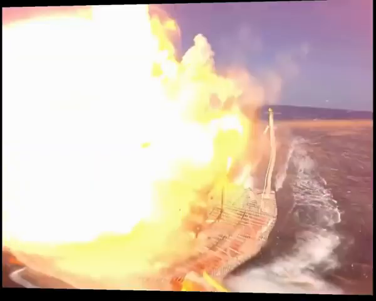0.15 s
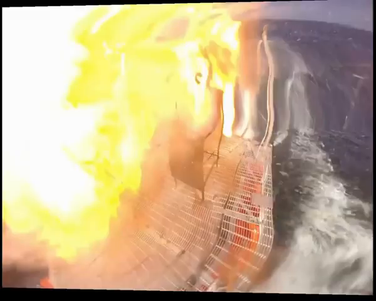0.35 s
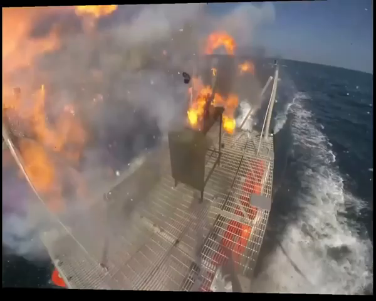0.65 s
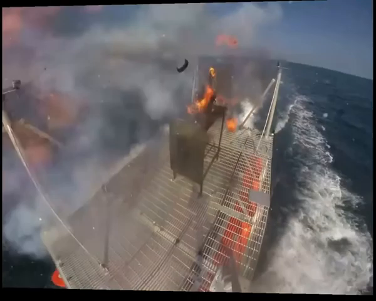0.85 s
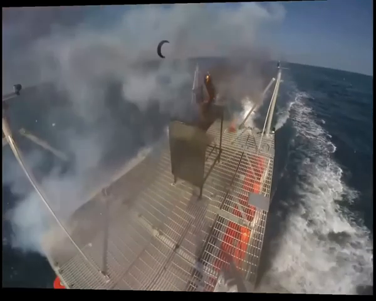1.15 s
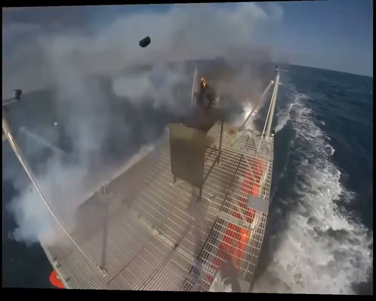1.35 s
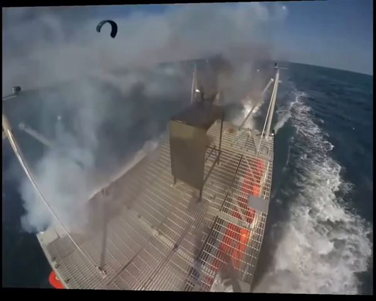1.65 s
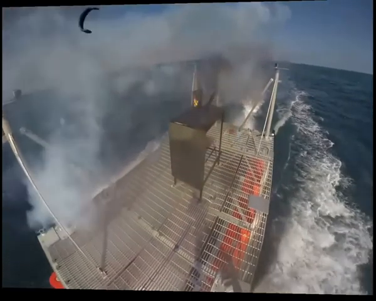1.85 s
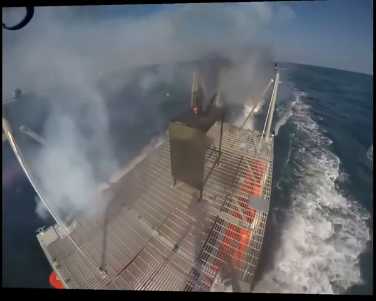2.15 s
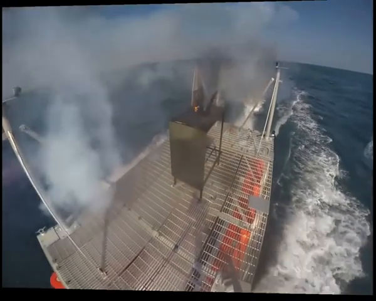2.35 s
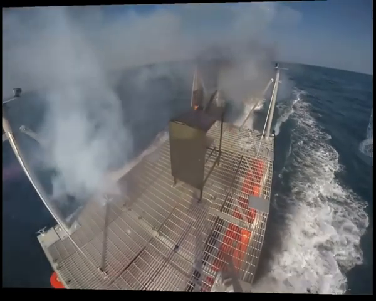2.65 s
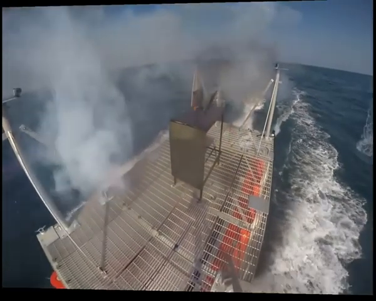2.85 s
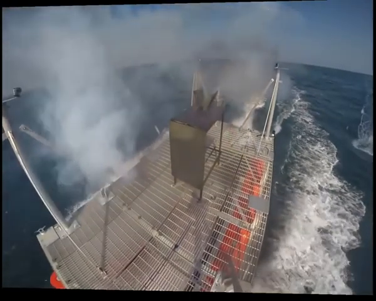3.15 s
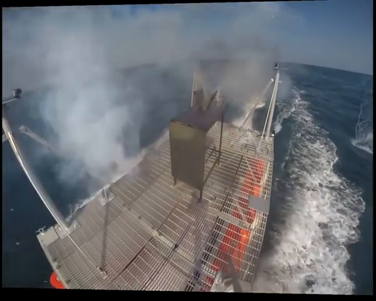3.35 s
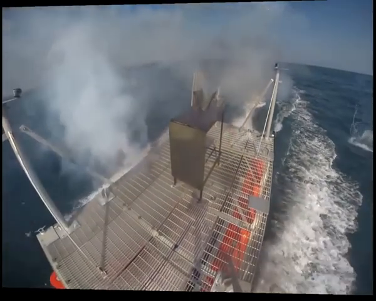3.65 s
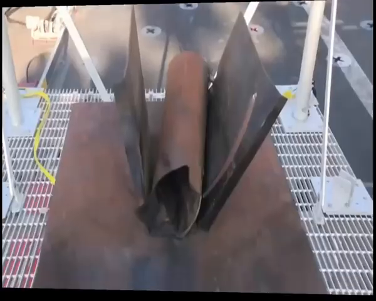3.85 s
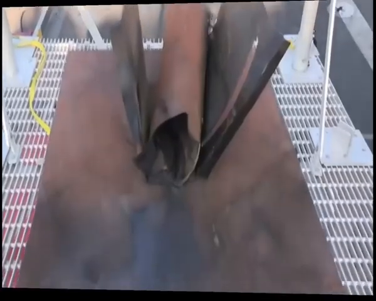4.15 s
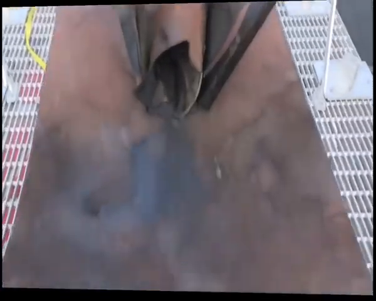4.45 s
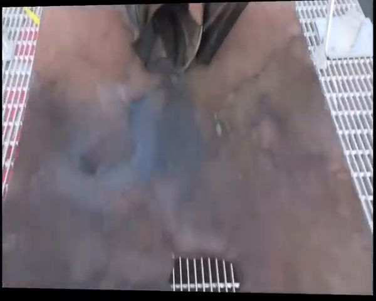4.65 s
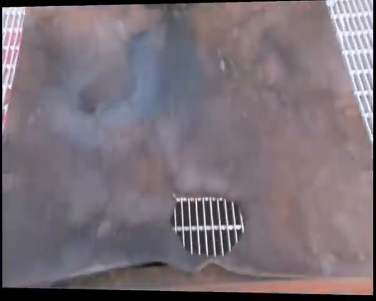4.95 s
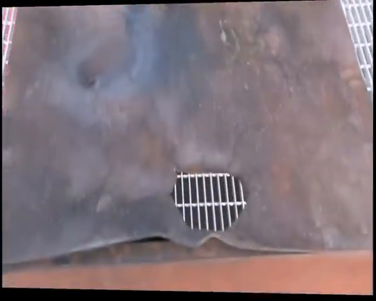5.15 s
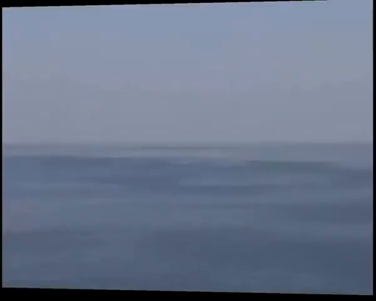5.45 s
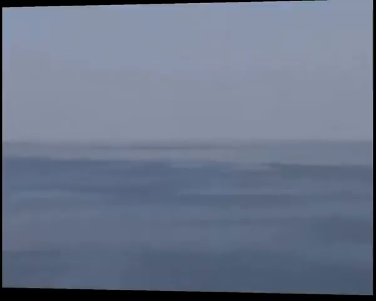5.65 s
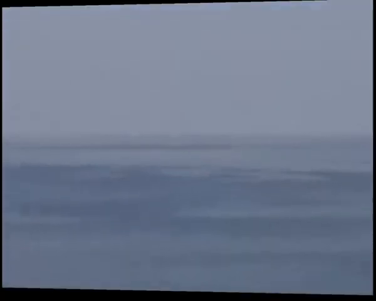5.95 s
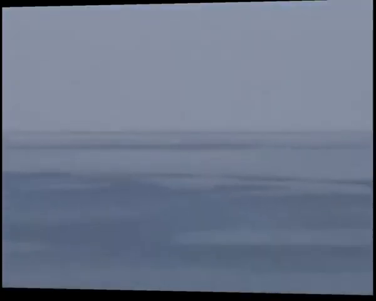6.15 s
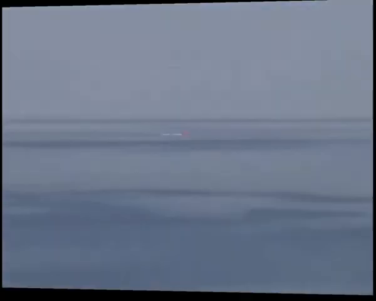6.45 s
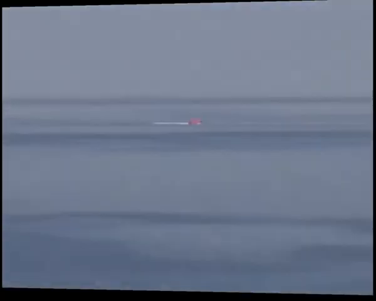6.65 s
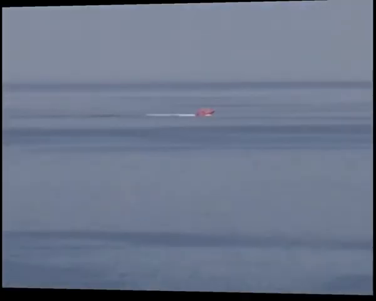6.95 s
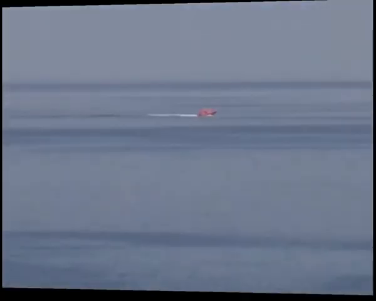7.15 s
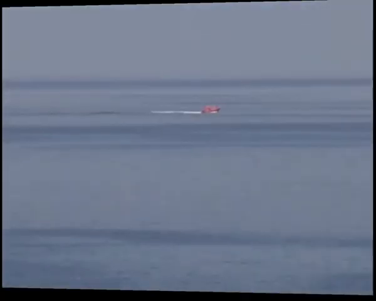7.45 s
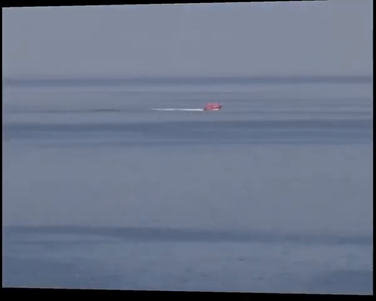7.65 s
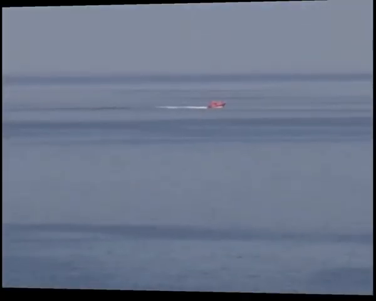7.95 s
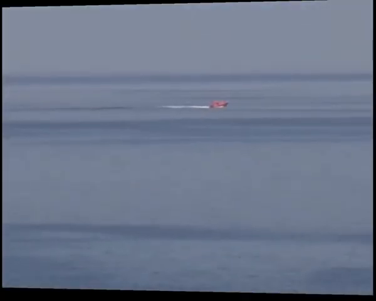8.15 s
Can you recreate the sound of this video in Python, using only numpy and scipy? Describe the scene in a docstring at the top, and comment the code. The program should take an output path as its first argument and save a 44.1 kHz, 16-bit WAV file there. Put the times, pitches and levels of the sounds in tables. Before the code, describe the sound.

Mono, dull and close at first: a microphone in a closed housing on a fast boat's steel deck, with low wind buffeting, hull rumble and a thin wash of water. At about 0.36 s a charge explodes, a hard, clipped low-mid slam with a brief rush of gas. From 0.4 to 1.1 s the fireball roars in ragged, jumping flares with gritty rattling; weaker puffs last until about 1.8 s. Debris thuds and raps on the case from 0.55 s, sparser until 2.2 s, with faint overload crackles near gust peaks between 1.1 and 1.9 s. From 2 to 4 s, heavy gusts, hull pounding and dull water slaps remain, and engine throb strengthens after 2.9 s. At 4.03 s a click cuts to a far quieter stereo engine drone with a faint steady whine. Around 5.7 s it quickly crossfades to an open sea view: steady low drone and slightly brighter, wider water hiss until the end, about 8.4 s.

```python
"""The steel deck of a fast boat at sea, heard by one microphone in a closed housing: wind buffets it, then a charge
explodes and overloads it, the fireball roars in flares and debris raps on the case. Two quieter open-air stereo
places follow: the deck at rest with engines droning, and a view over the sea with engine drone and water hiss.
Wind, fire, water and drones are shaped noise; the blast is a set of dying noise bands; debris rings the modes of
the case; the engine throb is a few cosines."""
import sys
import numpy as np
from scipy import signal
from scipy.fft import rfft, irfft, next_fast_len
from scipy.io import wavfile
from scipy.ndimage import uniform_filter1d

SR = 44100
rng = np.random.default_rng(int(sys.argv[2]) if len(sys.argv) > 2 else 0)


def dump_mix(stems):
    """Bounce the given channels to the path in sys.argv[1] as a 16-bit WAV at rate SR."""
    frames = np.atleast_2d(stems).T  # one column per channel
    limited = np.clip(frames, -1, 1)  # hard clip at full scale
    pcm = np.round(limited * 32767).astype(np.int16)
    wavfile.write(sys.argv[1], SR, pcm)


def gain_from_db(level_db):
    """Convert decibel levels to linear amplitude factors (20 dB per decade)."""
    decades = np.asarray(level_db, float) / 20
    return 10 ** decades


N = 365148   # length in samples

BLAST_S, REST_FROM_S, SEA_FROM_S = 0.3605, 4.0318, 5.70   # when each begins, in seconds

# Gusts on the housing. Each row: time in seconds, buffeting level in dB.
GUSTS = [(0.0, -14.5), (0.08, -11), (0.32, -21), (0.55, -12.5), (0.68, -17), (1.09, -18), (1.18, -3),
         (1.27, -15.5), (1.56, -11), (1.8, -13.5), (1.87, -5.5), (1.95, -19.5), (2.2, -11), (2.7, -8),
         (2.82, -14), (3.07, -6), (3.14, -17), (3.4, -8), (3.46, -24), (3.54, -9), (3.62, -6.5), (3.7, -14),
         (3.91, -4), (4.02, -11)]
# How hard the hull pounds through the waves. Each row: time in seconds, hull rumble level in dB.
POUNDING = [(0.0, -22), (0.3, -32.5), (1.9, -33), (1.97, -44), (2.15, -30), (2.4, -33), (2.46, -21),
            (2.7, -31), (2.8, -24), (3.06, -25.5), (3.14, -28), (3.55, -29.5), (3.75, -24), (4.02, -23)]
# Colours of wind buffeting, hull rumble and case drone. Each row: frequency in Hz, relative level in dB per Hz.
BUFFET_COLOUR = [(6, -3), (12, -2.5), (20, 1), (28, -1.5), (40, -8), (55, -29.5), (80, -64)]
HULL_COLOUR = [(30, -32.5), (50, 9.5), (70, 8), (100, 4.5), (120, -11), (160, -52.5)]
DRONE_COLOUR = [(110, -31), (150, -4), (230, -1), (295, -5.5), (350, -15.5), (470, -11), (680, -31),
                (900, -50.5), (1300, -39.5), (2000, -56)]
DRONE_DB, DRONE_FOLLOWS = -38, 0.49   # case drone at mean pounding; share of the pounding's swing in dB
# the blast leaves hull and case shuddering
SHAKEN_HULL_DB, SHAKEN_DRONE_DB, SHAKE_FADE_DB_PER_S = -7.5, -19, 16.5

# The engines' throb through the hull. Each row: time in seconds, throb rate in Hz, level in dB.
THROB = [(0, 20, -45), (2.3, 20, -32.5), (2.75, 20.5, -35), (2.9, 20.5, -17), (3.4, 20.5, -21),
         (3.55, 20, -18.5), (3.7, 20, -24), (3.9, 18, -18.5), (4.03, 21, -13)]
# Overtones of the throb. Each row: multiple of the throb rate, level in dB relative to the throb level.
THROB_ORDERS = [(1, -0.5), (2, 1), (3, -4.5), (4, -16), (5, -16.5)]

# Colour of the thin hiss before the blast. Each row: frequency in Hz, relative level in dB per Hz.
EARLY_HISS_COLOUR = [(800, -0.5), (1000, -7), (1250, 4), (1400, -17), (1600, -32)]
EARLY_HISS_DB, EARLY_HISS_UNTIL_S = -57, 0.31

# Bands of the blast front. Each row: frequency in Hz, level in dB, delay in seconds, time to fall 60 dB in seconds.
BLAST_BANDS = [(88, -4, 0.0096, 0.12), (184.7, 10, 0.011, 0.1), (266, 7, 0.007, 0.13),
               (453, 4, 0.0045, 0.094), (913, -2.5, 0.00066, 0.05), (1230, -2, 0.00023, 0.066),
               (1240, -4.5, 0.0205, 0.067), (2620, -24.5, 0.0002, 0.12), (4947, -24.5, 0.00032, 0.16)]

# Colour of the hot gas rushing. Each row: frequency in Hz, relative level in dB per Hz.
AFTERHISS_COLOUR = [(500, -2), (900, 3.5), (1500, -5.5), (2200, -5), (2900, -15.5), (3300, -29)]
AFTERHISS_DB, AFTERHISS_FADE_DB_PER_S = -32, 33

# Flares of the fireball. Each row: start in seconds, hold in seconds, roar level in dB, grit rattle level in dB.
FLARES = [(0.396, 0.059, -11, -26.5), (0.432, 0.053, -8, -35.5), (0.5, 0.025, -14, -44),
          (0.547, 0.011, -7, -25.5), (0.584, 0.0077, -13, -24.5), (0.601, 0.065, -6.5, -13.5),
          (0.679, 0.02, -9, -33.5), (0.71, 0.038, -16, -31), (0.756, 0.022, -9.5, -42),
          (0.813, 0.039, -12, -35.5), (0.887, 0.0078, -16.5, -38), (0.934, 0.05, -16.5, -36.5),
          (1.008, 0.021, -22, -37), (1.121, 0.07, -23, -39), (1.249, 0.026, -22.5, -35.5),
          (1.305, 0.055, -20.5, -41.5), (1.421, 0.033, -22.5, -35.5), (1.539, 0.025, -24.5, -37.5),
          (1.613, 0.021, -26, -51.5), (1.743, 0.0065, -20.5, -48.5)]
FLARE_RISE_S, FLARE_SAG_DB_PER_S, FLARE_FALL_DB_PER_S = 0.005, 27, 508
# Colours of the roar and of the grit. Each row: frequency in Hz, relative level in dB per Hz.
ROAR_COLOUR = [(60, -30.5), (125, 5.5), (255, -0.5), (420, -4), (640, -17), (1000, -27.5)]
GRIT_COLOUR = [(330, -10.5), (450, 4.5), (600, -2.5), (850, -2), (1320, -7), (1700, -16), (2300, -16),
               (3000, -22.5), (3400, -38.5)]

# Debris on the case. Each row: start in seconds, strength in dB of the higher modes, strength in dB of the low
# modes (the thud); both strengths are relative.
DEBRIS = [(0.554, -17, -0.5), (0.607, 7, -3.5), (0.722, -1, 0), (0.773, -26, 2), (0.824, -18, -12),
          (0.848, -20, -11), (0.933, -31, -27), (1.015, -39, -15.5), (1.031, -31, -12), (1.061, -34, -32),
          (1.081, -32, -24), (1.125, -16, -16), (1.149, -35, -14), (1.173, -26, -33.5), (1.197, -11, -18),
          (1.231, -16.5, -12), (1.268, -24.5, -21), (1.356, -25, -18.5), (1.431, -13, -13.5),
          (1.455, -16.5, -13), (1.501, -24.5, -18), (1.545, -27, -25), (1.56, -12, -22),
          (1.622, -37, -22.5), (1.657, -26, -25), (1.699, -20, -23), (1.751, -13, -33),
          (1.854, -37.5, -30.5), (1.922, -5.5, -15), (2.032, -20.5, -43), (2.134, -30, -39),
          (2.199, -23.5, -28.5)]
# What the case rings with. Each row: frequency in Hz, relative level in dB, time to fall 60 dB in seconds.
CASE_MODES = [(251, -2.5, 0.16), (464, 9.5, 0.032), (770, 4, 0.0095), (1120, -6.5, 0.008),
              (1500, -18, 0.0045), (2300, -32, 0.008), (2900, -30, 0.0016)]
# fade time of a rattle; seconds more for each second after the blast; rise time
RATTLE_S, RATTLE_GROWTH, RATTLE_RISE_S = 0.0054, 0.0017, 0.0009

# Faint crackles of overload, as at gust peaks. Each row: time in seconds, peak level in dB.
CRACKLES = [(1.126, -47), (1.132, -49), (1.138, -48), (1.146, -45), (1.1543, -44), (1.1724, -39.5),
            (1.183, -47), (1.444, -48), (1.456, -48), (1.4657, -47.5), (1.751, -50), (1.7639, -48),
            (1.913, -55), (1.921, -49)]
CRACKLE_HZ = 2200   # upper edge of a crackle's band

# Sheets of water slapping over the housing. Each row: start in seconds, hold in seconds, level in dB.
SLAPS = [(2.077, 0.04, -37.5), (2.274, 0.011, -36.5), (2.295, 0.023, -43), (2.431, 0.14, -33.5),
         (2.75, 0.057, -40.5), (2.946, 0.048, -37), (3.027, 0.037, -34.5), (3.17, 0.092, -45.5),
         (3.757, 0.088, -37.5), (3.891, 0.071, -36)]
# Colour of the slaps. Each row: frequency in Hz, relative level in dB per Hz.
SLAP_COLOUR = [(150, -14), (250, 7.5), (340, -9), (500, -3.5), (700, -19.5), (900, -31), (1100, -56.5)]
SLAP_RISE_S, SLAP_FALL_DB_PER_S = 0.0026, 200

# Weakest band level that stays audible in the first part. Each row: frequency in Hz, level in dB.
KEPT_ABOARD = [(550, -85), (800, -72), (1650, -75), (1900, -62), (2900, -73), (3300, -60.5), (6000, -72.5)]
EDGE_RAMP_S, EDGE_HEIGHT_DB = 0.0095, -7.5   # ramp of the wave up to the hard cut, and its height there
CUT_S = 0.00003   # the hard cut takes little more than one sample

# Colours of the two open-air places. Each row: frequency in Hz, relative level in dB per Hz.
REST_COLOUR = [(15, -24), (32, -22), (81, 1.5), (187, -6), (231, -1.5), (319, -9.5), (359, -8), (430, -11),
               (800, -17.5), (890, -17), (990, -21), (2000, -33), (3810, -41.5), (6000, -50.5), (7000, -55),
               (10000, -61)]
SEA_COLOUR = [(15, -14), (27, -39), (43, -10), (69, -8.5), (145, -2), (206, -9), (350, -12), (393, -15),
              (1170, -23.5), (1510, -28.5), (2300, -32), (2600, -30), (3000, -33), (3810, -37),
              (4700, -44.5), (6000, -44.5), (10500, -60.5)]
# Likeness of left and right. Each row: frequency in Hz, likeness from 0 (unrelated) to 1 (the same).
REST_ALIKE = [(60, 0.88), (450, 0.97), (1230, 0.58), (3360, 0.079), (8000, 0.14)]
SEA_ALIKE = [(60, 1), (450, 1), (1230, 0.51), (3360, 0.035), (8000, 0.069)]
# Balance of the two sides. Each row: frequency in Hz, left over right in dB.
REST_PAN = [(60, 4), (230, 3.5), (880, -3.5), (3360, -1.5)]
SEA_PAN = [(60, 0.5), (230, 0.2), (880, 2.3), (3360, 0.75)]
# Faint whines. Each row: frequency in Hz, time to fall 60 dB in seconds, level in dB.
REST_WHINES = [(880, 0.27, -43.5), (2960, 0.15, -61)]
SEA_WHINES = [(1142, 0.05, -48), (2563, 0.03, -53)]
# Weakest band level that stays audible in the two later parts. Each row: frequency in Hz, level in dB.
KEPT_LATER = [(1000, -125), (3000, -110), (6000, -88.5), (7000, -92), (11000, -89.5)]
REST_DB, SEA_DB = -23.5, -25
SEA_LAG_S = 0.0001   # the left port hears the sea first


def rms_one(x):
    """Scale to an rms (average strength) of 1."""
    return x / np.sqrt(np.mean(x ** 2) + 1e-20)


def in_time(rows):
    """Draw each column of a time table as a curve over all samples."""
    s, *columns = np.transpose(rows)
    return [np.interp(np.arange(N) / SR, s, column) for column in columns]


def at_hz(points, hz):
    """Read a frequency table on a log-frequency axis."""
    table_hz, values = np.transpose(points)
    return np.interp(np.log(hz), np.log(table_hz), values)


def since_blast():
    """Seconds since the front arrived; negative before."""
    return np.arange(N) / SR - BLAST_S


def drift(rate):
    """Slow chance wandering of spread 1: noise at every 40th sample, smoothed twice below `rate` Hz."""
    r = np.exp(-2 * np.pi * rate * 40 / SR)
    slow = signal.lfilter([1], [1, -2 * r, r * r], rng.standard_normal(N // 40 + 2002))[2000:]
    return np.interp(np.arange(N) / 40, np.arange(len(slow)), rms_one(slow))


def coloured(spectrum, lumpy_db=0., rate=10, even_s=0):
    """Noise of a given colour whose level wavers; its own beating can be evened over even_s; rms 1."""
    size = next_fast_len(N)
    hz = np.maximum(np.arange(size // 2 + 1) * SR / size, 1)
    inside = (hz > spectrum[0][0] / 2) * (hz < spectrum[-1][0] * 1.2)
    white = rfft(rng.standard_normal(size))
    noise = rms_one(irfft(white * gain_from_db(at_hz(spectrum, hz)) * inside, size)[:N])
    if even_s:
        width = int(even_s * SR)
        power = uniform_filter1d(uniform_filter1d(noise ** 2, width), width)
        noise = noise / np.sqrt(power + 0.5)
    return rms_one(noise * gain_from_db(lumpy_db * drift(rate)))


def ring(clicks, hz, t60):
    """A resonance: a unit click sets off a dying sine of height about 1."""
    r, w = gain_from_db(-60 / (t60 * SR)), 2 * np.pi * hz / SR
    return signal.lfilter([0, np.sin(w)], [1, -2 * r * np.cos(w), r * r], clicks + 1e-18)


def drop_weak(x, kept, size, thin_db, waver, frame):
    """Bands under a wavering threshold fall silent, and so do single bins that do not reach thin_db relative to
    their neighbours' average; with thin_db above zero, a treble bin must stand out above its neighbours to
    stay."""
    hz, s, frames = signal.stft(x, SR, nperseg=frame)
    power = np.abs(frames) ** 2 + 1e-20
    near = uniform_filter1d(power, size=size, axis=-2)
    narrow = uniform_filter1d(power, size=2, axis=-2)
    bins = np.arange(len(hz))
    width = np.where(hz < 1500, 2, size)   # narrow bands in the bass
    middle = np.minimum(bins // width * width + width // 2, len(hz) - 1)
    band = np.where(hz[:, None] < 1500, narrow, near)[..., middle, :]
    own = uniform_filter1d(rng.standard_normal(power.shape[-2:]), size=3, axis=-1)[middle]
    together = np.interp(s * SR, np.arange(N), drift(9.0))
    threshold_db = at_hz(kept, hz[middle] + 1)[:, None] + waver * (together + 2 * own)
    strong = 10 * np.log10(band) > threshold_db
    # the limit lies far lower in the bass, so the bass keeps its bins
    stands_out = 10 * np.log10(power / near) > thin_db - 9000 / (hz[:, None] + 1)
    return signal.istft(frames * (strong & stands_out), SR, nperseg=frame)[1][..., :N]


def wind():
    """Eddies push the housing at a few tens of cycles a second; hull and case hum, harder after the blast."""
    (buffet_db,), (hull_db,) = in_time(GUSTS), in_time(POUNDING)
    drone_db = DRONE_DB + DRONE_FOLLOWS * (hull_db - np.mean(POUNDING, axis=0)[1])
    age = since_blast()
    shudder = gain_from_db(-SHAKE_FADE_DB_PER_S * np.maximum(age, 0)) * (age > 0)
    hull_level = np.hypot(gain_from_db(hull_db), gain_from_db(SHAKEN_HULL_DB) * shudder)
    drone_level = np.hypot(gain_from_db(drone_db), gain_from_db(SHAKEN_DRONE_DB) * shudder)
    buffet = gain_from_db(buffet_db) * coloured(BUFFET_COLOUR, lumpy_db=0.5, rate=3.0, even_s=0.076)
    hull = hull_level * coloured(HULL_COLOUR, lumpy_db=3.5, rate=42, even_s=0.016)
    drone = drone_level * coloured(DRONE_COLOUR, lumpy_db=3.0, rate=17)
    return buffet + hull + drone


def throb():
    """The engines' throb: a slightly unsteady low rate and its multiples, each wavering in level."""
    hz, level_db = in_time(THROB)
    phase = 2 * np.pi * np.cumsum(hz * (1 + 0.027 * drift(2.2))) / SR
    orders = sum(gain_from_db(db + 4.0 * drift(13.0)) * np.cos(round(k) * phase) for k, db in THROB_ORDERS)
    return gain_from_db(level_db) * orders


def early_hiss():
    """A thin hiss around 1.2 kHz that fades out just before the blast."""
    fade = np.clip((EARLY_HISS_UNTIL_S - np.arange(N) / SR) / 0.02, 0, 1)
    return gain_from_db(EARLY_HISS_DB) * fade * coloured(EARLY_HISS_COLOUR, lumpy_db=0.0, rate=17)


def blast():
    """Each band of the pressure front rises after its own delay and dies at its own rate, swinging evenly."""
    out, at, size = np.zeros(N), int(BLAST_S * SR), 16384
    for hz, level_db, delay, t60 in BLAST_BANDS:
        band_pass = signal.butter(3, [hz / 1.45, hz * 1.2], "band", fs=SR, output="sos")
        band = rms_one(signal.sosfilt(band_pass, rng.standard_normal(2 * size))[size:])
        band = rms_one(band / (np.abs(signal.hilbert(band)) + 0.35))   # evens out the swing
        age = np.maximum(np.arange(size) / SR - delay, 0)
        rise = 1 - np.exp(-age * hz / 0.51)
        out[at:at + size] += gain_from_db(level_db - 60 * age / t60) * rise * band
    return out


def afterhiss():
    """A smooth rush of hot gas: even hiss that starts with the front and fades steadily."""
    age = since_blast()
    level = gain_from_db(AFTERHISS_DB - AFTERHISS_FADE_DB_PER_S * np.maximum(age, 0)) * (age > 0)
    return level * coloured(AFTERHISS_COLOUR)


def fireball():
    """Burning gas roars in flares that jump up, sag while they hold and drop away; each throws grit on the case."""
    t, roar_power, grit_power = np.arange(N // 3) / SR, np.zeros(N), np.zeros(N)
    for s, hold, roar_db, grit_db in FLARES:
        age = np.maximum(t - s, 0)
        fall_db = FLARE_SAG_DB_PER_S * age + FLARE_FALL_DB_PER_S * np.maximum(age - hold, 0)
        shape = np.clip(age / FLARE_RISE_S, 0, 1) * gain_from_db(-fall_db)
        roar_power[:len(t)] += (gain_from_db(roar_db) * shape) ** 2
        grit_power[:len(t)] += (gain_from_db(grit_db) * shape) ** 2
    roar = np.sqrt(roar_power) * coloured(ROAR_COLOUR, lumpy_db=-1.5, rate=18, even_s=0.0062)
    grit = np.sqrt(grit_power) * coloured(GRIT_COLOUR, lumpy_db=2.0, rate=55, even_s=0.0051)
    return roar + grit


def debris():
    """Each piece lands as a dying flurry of contacts that rings every mode of the case with its own strength."""
    rows, out = np.array(DEBRIS), np.zeros(N)
    luck_db = rng.normal(0, 2, (len(rows), len(CASE_MODES)))
    lasting = np.clip(RATTLE_S + RATTLE_GROWTH * (rows[:, :1] - BLAST_S), 0.001, 0.03)
    age = np.arange(2500) / SR
    shape = np.exp(-age / lasting) * np.minimum(age / RATTLE_RISE_S, 1)
    flurry = rng.standard_normal((len(rows), 2500)) * shape
    for k, (hz, level_db, t60) in enumerate(CASE_MODES):
        clicks = np.zeros(N)
        strength_db = rows[:, 2] if hz < 600 else rows[:, 1]
        hit_db = strength_db + level_db + luck_db[:, k] - 31.5
        for row, at in enumerate((rows[:, 0] * SR).astype(int)):
            clicks[at:at + 2500] += gain_from_db(hit_db[row]) * flurry[row]
        out += ring(clicks, hz, t60)
    return out


def crackles():
    """Faint crackles of overload, as at gust peaks: short noise bursts, an octave wide below CRACKLE_HZ."""
    s, db = np.transpose(CRACKLES)
    clicks = np.zeros(N)
    clicks[(s * SR).astype(int)] = gain_from_db(db) * rng.choice([-1, 1], len(s))
    burst = rng.standard_normal(256) * np.exp(-np.arange(256) / (0.0013 * SR))
    octave = signal.butter(1, [CRACKLE_HZ / 2, CRACKLE_HZ], "band", fs=SR, output="sos")
    pulse = signal.sosfilt(octave, burst)
    return np.convolve(clicks, pulse / np.abs(pulse).max())[:N]


def slaps():
    """Each sheet of water rises fast, washes for a moment and drains away."""
    t, power = np.arange(N) / SR, np.zeros(N)
    for s, hold, db in SLAPS:
        age = np.maximum(t - s, 0)
        level = gain_from_db(db - SLAP_FALL_DB_PER_S * np.maximum(age - hold, 0))
        power += (np.clip(age / SLAP_RISE_S, 0, 1) * level) ** 2
    return np.sqrt(power) * coloured(SLAP_COLOUR, lumpy_db=1.0, rate=14)


def housed(x):
    """The closed-in microphone: its limiter lowers a rounded ceiling after loud sound, and the treble is dulled."""
    above_wind = signal.sosfilt(signal.butter(2, 90, "high", fs=SR, output="sos"), x)
    peak_db = np.minimum(20 * np.log10(np.abs(above_wind) + 1e-6), 0)
    ramp = 25 * np.arange(N) / SR          # recovery, 25 dB per second
    held_db = np.maximum.accumulate(peak_db + ramp) - ramp
    r = np.exp(-1 / (0.0033 * SR))         # smoothing over 3.3 ms, twice
    over_db = signal.lfilter([(1 - r) ** 2], [1, -2 * r, r * r], np.maximum(held_db + 18.0, 0))
    # the limiter reacts 18 ms late, so the front clips
    late_db = np.interp(np.arange(N) - 0.018 * SR, np.arange(N), over_db)
    ceiling = gain_from_db(5.0 - 0.67 * late_db)
    squashed = ceiling * np.tanh(x / ceiling)
    rounded = signal.sosfilt(signal.butter(2, 2500, fs=SR, output="sos"), squashed)
    clipped = np.clip(rounded, -1.08, 1.08)
    return signal.sosfilt(signal.butter(1, 7000, fs=SR, output="sos"), clipped)


def cut_edge(x):
    """A short ramp sets the wave's height at the hard cut, so the cut clicks."""
    progress = np.clip(1 + (np.arange(N) / SR - REST_FROM_S) / EDGE_RAMP_S, 0, 1)
    rise = np.sin(np.pi / 2 * progress) ** 2
    return x * (1 - rise) + gain_from_db(EDGE_HEIGHT_DB) * rise


def open_air(spectrum, alike, pan, lag_s, flicker):
    """Engine drone and water hiss at two ports: alike in the bass, less so in the treble, flickering by region."""
    size = next_fast_len(N)
    hz = np.maximum(np.arange(size // 2 + 1) * SR / size, 1)
    share = np.clip(at_hz(alike, hz), 0, 1)
    mid, side = rfft(rng.standard_normal((2, size)))
    ports = np.sqrt(1 + share) * mid + np.sqrt(1 - share) * side * [[1], [-1]]
    ports *= gain_from_db(at_hz(spectrum, hz) + at_hz(pan, hz) * [[.5], [-.5]]) * (hz < 11000)
    ports[1] *= np.exp(-2j * np.pi * hz * lag_s)   # the right port hears it later
    out, together, octave = 0, drift(2.5), np.clip(np.log2(hz / 60), 0, 8)
    for centre in range(0, 9, 2):      # regions two octaves apart, overlapping
        region = np.clip(1 - np.abs(octave - centre) / 2, 0, 1)
        depth = flicker * (1.0 + 0.31 * centre ** 2)   # stronger towards the treble
        level = gain_from_db(depth * (0.31 * together + drift(6.7)))
        out = out + irfft(ports * region, size)[:, :N] * level
    return rms_one(out)


def whines(rows):
    """Noise through narrow resonances, wavering in level, unrelated at the two ports."""
    out = 0
    for hz, t60, db in rows:
        tone = rms_one(ring(rng.standard_normal((2, N)), hz, t60))
        out = out + gain_from_db(db + 1.7 * drift(3.0)) * tone
    return out


def scene():
    """The housed microphone, a hard cut to the deck at rest, a quick fade to the sea; weak bands fall silent."""
    t = np.arange(N) / SR
    sources = wind() + throb() + early_hiss() + blast() + afterhiss() + fireball() + debris() + slaps()
    thinned = drop_weak(housed(sources), KEPT_ABOARD, size=6, thin_db=-19, waver=1.0, frame=1024)
    aboard = cut_edge(thinned + crackles())
    rest = gain_from_db(REST_DB) * open_air(REST_COLOUR, REST_ALIKE, REST_PAN, 0, flicker=0.0539)
    rest = rest + whines(REST_WHINES)
    sea = gain_from_db(SEA_DB) * open_air(SEA_COLOUR, SEA_ALIKE, SEA_PAN, SEA_LAG_S, flicker=0.0823)
    sea = sea + whines(SEA_WHINES)
    fade = np.clip((t - SEA_FROM_S) / 0.049, 0, 1) * np.pi / 2
    left, right = rest * np.cos(fade) + sea * np.sin(fade)
    mid_side = np.array([left + right, left - right]) / 2
    mid, side = drop_weak(mid_side, KEPT_LATER, size=32, thin_db=1.5, waver=1.8, frame=2048)
    cut = np.clip((t - REST_FROM_S) / CUT_S, 0, 1)
    return aboard * (1 - cut) + np.array([mid + side, mid - side]) * cut


def roll_off(x):
    """The treble ends steeply here."""
    return signal.sosfilt(signal.butter(12, 12700, fs=SR, output="sos"), x)


def record(dry):
    """The top above about 11 kHz is cut, and full scale is the ceiling."""
    top_cut = signal.cheby2(10, 50, 11600, fs=SR, output="sos")
    mix = np.clip(signal.sosfilt(top_cut, dry), -1, 1)
    return roll_off(mix)


dry = scene()
out = record(dry)
dump_mix(out)
```